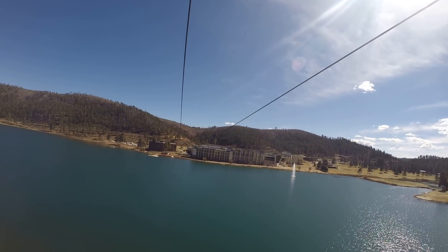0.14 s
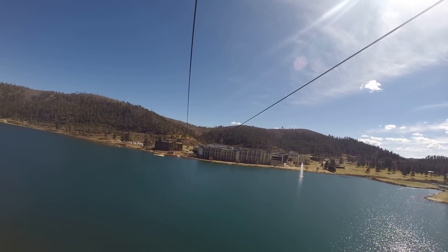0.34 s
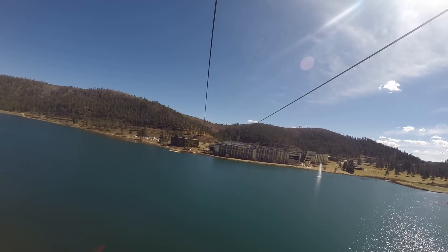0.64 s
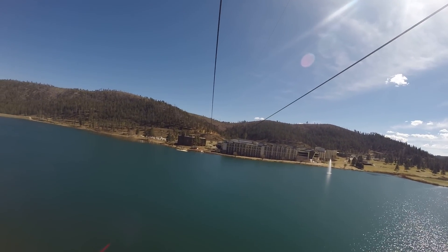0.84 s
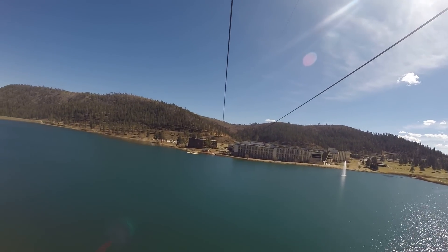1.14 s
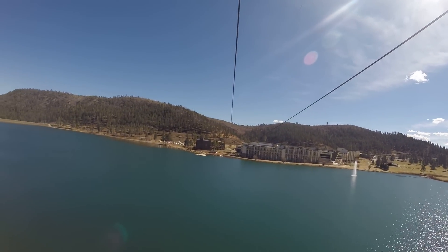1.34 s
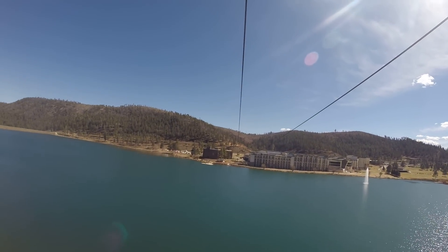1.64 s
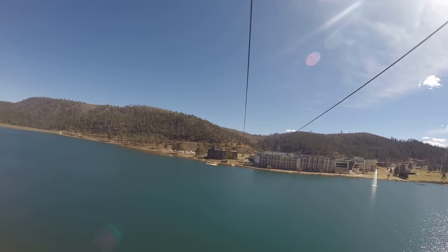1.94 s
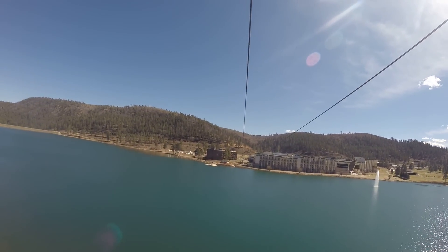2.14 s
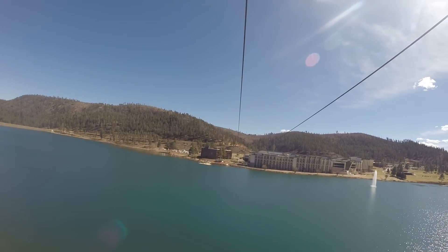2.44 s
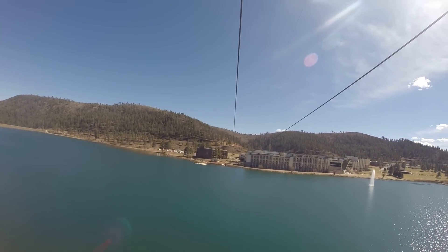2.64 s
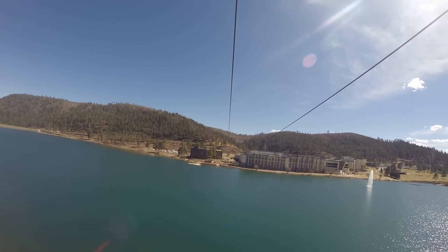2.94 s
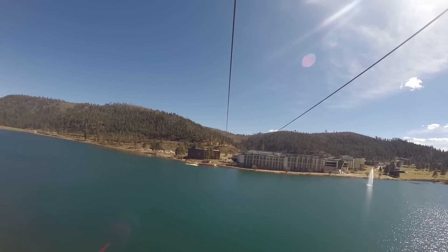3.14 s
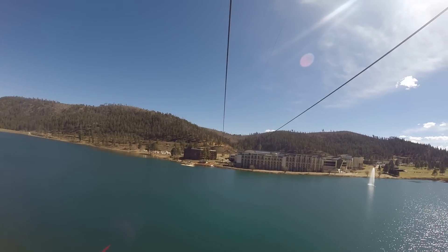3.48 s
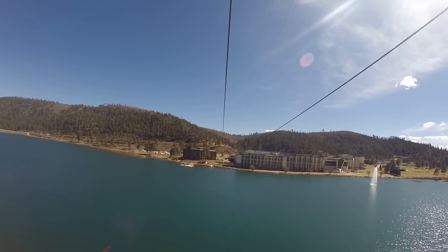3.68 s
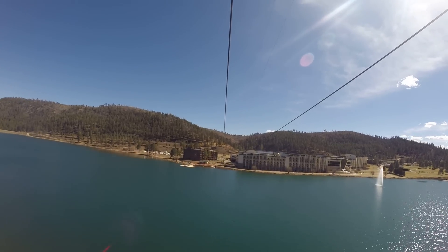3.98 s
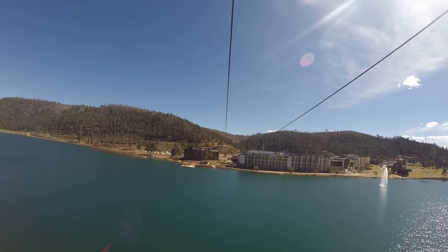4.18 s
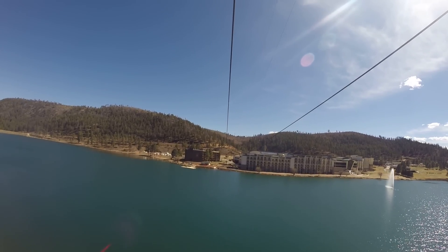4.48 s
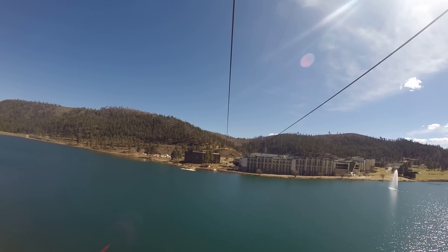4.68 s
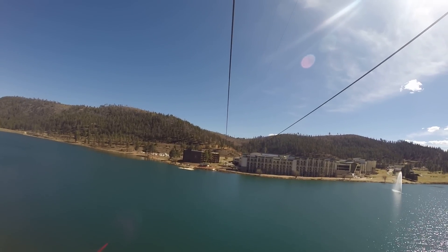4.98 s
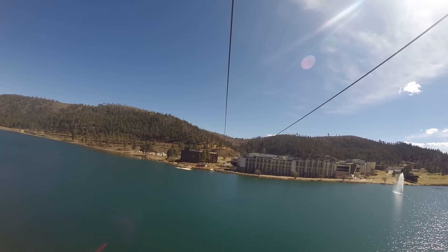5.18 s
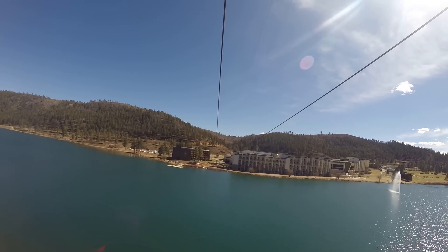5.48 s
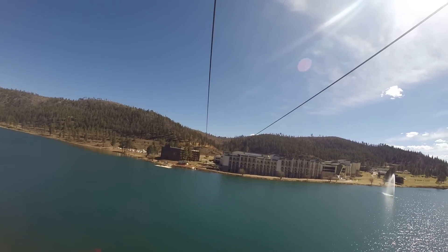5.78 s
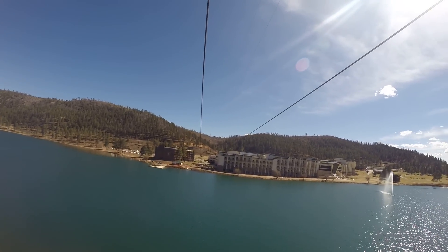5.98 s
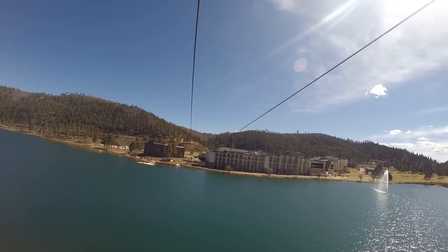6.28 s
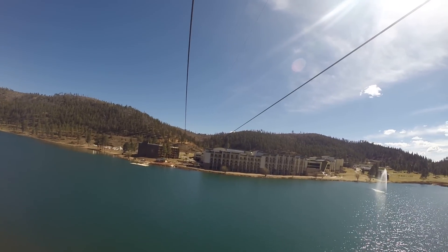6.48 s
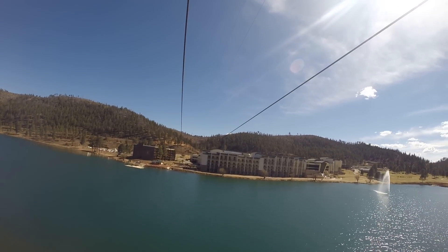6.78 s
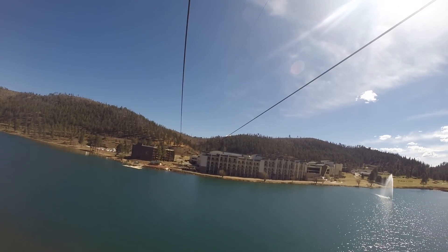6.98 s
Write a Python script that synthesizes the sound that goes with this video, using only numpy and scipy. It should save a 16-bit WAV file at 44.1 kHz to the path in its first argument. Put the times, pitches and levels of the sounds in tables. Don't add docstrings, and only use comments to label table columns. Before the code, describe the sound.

A pulley trolley rolls without pause down a steel cable above open water. Its wheel sings a dense, wavering, high metallic whine, joined by a second close tone from the cable strands. Sandy hiss shakes through the metal frame, with brief shudders and tiny skips. Wind buffets and roars at a microphone mounted right beside the trolley. The pitch slowly sinks as the ride eases, while the hiss grows rougher near the end.

```python
import sys
import numpy as np
from scipy import signal
from scipy.fft import rfft, irfft, next_fast_len
from scipy.io import wavfile
from scipy.ndimage import uniform_filter1d

SR = 44100
rng = np.random.default_rng(int(sys.argv[2]) if len(sys.argv) > 2 else 0)


def to_linear_factor(level_db):
    exponent = np.asarray(level_db, float) / 20
    return 10 ** exponent


def wav_record(signal):
    frames = np.transpose(np.atleast_2d(signal))
    bounded = np.clip(frames, -1, 1)
    quanta = np.round(bounded * 32767).astype(np.int16)
    wavfile.write(sys.argv[1], SR, quanta)


N = 313989
SIZE = next_fast_len(N, True)
HZ = np.fft.rfftfreq(SIZE, 1 / SR)
TIME = np.arange(N) / SR


def curves(table):
    s, *columns = np.transpose(table)
    return [np.interp(TIME, s, c) for c in columns]


def walk(rate):
    hold = int(SR / rate)
    steps = np.repeat(rng.standard_normal(N // 50), hold)[:N]
    smooth = uniform_filter1d(uniform_filter1d(steps, hold), hold)
    return 1.49 * smooth


def swell(s, width):
    return np.exp(-((TIME - s) / width) ** 2)


def from_mean(curve):
    return curve - curve.mean()


def lift(modes, hz):
    return sum(db / (1 + (2 * (hz - centre) / width) ** 2) for centre, width, db in modes)


def colour(points):
    hz, db = np.transpose(points)
    return np.interp(np.log(HZ + 1), np.log(hz), db)


def rush(colour_db, spans):
    spectrum = rfft(rng.standard_normal(SIZE)) * to_linear_factor(colour_db)
    third = np.log2(HZ + 1) * 3
    out = 0
    for lo, hi, level_db, flicker_db in spans:
        gust = walk(9)
        part = 0
        for centre in np.arange(np.ceil(3 * np.log2(lo)), 3 * np.log2(hi)):
            window = np.cos(np.pi / 2 * np.clip(third - centre, -1, 1)) ** 2
            band = irfft(spectrum * window, SIZE)[:N]
            part = part + band * to_linear_factor(flicker_db * (0.76 * walk(14) + 0.2 * gust))
        out = out + part / part.std() * to_linear_factor(level_db)
    return out


def tone(turns, db, waver_db):
    strength = np.sqrt(2) * to_linear_factor(db + waver_db * walk(4.03))
    drift_turns = .3 * walk(2)
    return strength * np.sin(2 * np.pi * (turns + rng.random() + drift_turns))


def controls():
    # time in seconds, load on the wheel as frame hiss in dB.
    load = [(0.0, -28), (0.48, -27), (0.5, -26), (0.85, -27), (0.97, -25.5), (1.07, -26.5), (1.76, -26),
            (1.78, -28.5), (3.01, -29.5), (3.09, -27), (3.79, -29.5), (3.98, -27.5), (5.61, -27.5),
            (5.83, -24.5), (6.66, -24), (7.12, -24)]
    # time in seconds, head wind as rush in dB, camera turned toward the side plate in dB.
    head_wind = [(0.0, -35, 3), (0.14, -32.5, 4), (0.3, -35, 4), (0.59, -34.5, 0), (0.63, -32.5, 2),
                 (0.75, -35.5, 0), (0.81, -30.5, 0.5), (2.32, -36, -3.5), (2.36, -34, -4), (2.6, -37.5, -2),
                 (4.0, -39, -1.5), (4.1, -36, -3), (4.64, -39, 0), (6.21, -32.5, 3), (6.31, -33.5, 1.5),
                 (7.12, -32, 4.5)]
    # time in seconds, width in seconds, frame rise in dB, top hiss rise in dB.
    jolts = [(.16, .05, 2.2, -1), (.79, .02, .8, 7), (.97, .05, 2.7, 0), (1.72, .05, 0.5, 2),
             (3.15, .04, 0.5, 0), (3.55, .04, -1.5, 0), (4.17, .05, 2.5, 1), (5.02, 0.027, 2, 1.2),
             (5.73, 0.011, -5, 2), (2.35, 0.028, 3.5, .6), (3.45, .08, -2, 0.3), (4.45, .1, -1, 0)]
    # time in seconds, width in seconds, buffeting rise in dB.
    puffs = [
        (.4, 0.25, -2),
        (2.7, 0.26, 2.5),
        (3.8, 0.49, 0.5),
        (5.1, .25, -1),
        (5.6, 0.13, 0.5),
        (6.8, 0.45, -0.5),
    ]
    (load_db,), (rush_db, turn_db) = curves(load), curves(head_wind)
    gust_db = from_mean(rush_db)

    body_db = load_db - .8 + sum(db * swell(s, w) for s, w, db, _ in jolts)
    upper_db = -42 + 0.46 * from_mean(body_db)
    top_db = -58.5 + .3 * gust_db + .3 * turn_db + 0.12 * from_mean(load_db)
    top_db = top_db + sum(db * swell(s, w) for s, w, _, db in jolts)
    low_db = -44 + 1.1 * gust_db
    plate_db = .7 * gust_db + turn_db

    buffet_db = -38 + 0.31 * gust_db + .7 * walk(3)
    buffet_db = buffet_db + sum(db * swell(s, w) for s, w, db in puffs)
    squall_db = 1.5 * swell(1.12, 0.54)
    roar_db = -43.5 + 0.84 * gust_db - .3 * turn_db + squall_db
    return (body_db, upper_db, top_db, low_db, plate_db), (buffet_db, roar_db, rush_db)


def wind(buffet_db, roar_db, rush_db):
    # frequency in Hz, noise level in dB per Hz.
    wind_colour = [(13, -43), (22, -7.5), (112, -2), (290, -6), (458, -14.5), (750, -15), (825, -13),
                   (924, -15.5), (1040, -12), (1430, -2), (1830, -7.5), (1940, -4), (2050, -9), (2660, -44),
                   (4510, -120)]
    port = [(25, 38, -12)]
    between_db = (1.385 * buffet_db + 0.63 * roar_db) / 2 - 7
    return rush(colour(wind_colour) + lift(port, HZ), [(15, 210, buffet_db - .3, .3),
                                                       (210, 300, between_db, 0.41),
                                                       (300, 900, roar_db + 1.0, 0.61),
                                                       (900, 1900, rush_db + 0.085, 1.0)])


def frame(body_db, upper_db, top_db, low_db, plate_db, wheel):
    # frequency in Hz, noise level in dB per Hz.
    frame_colour = [(1090, -32), (1850, -3.5), (1960, -8.5), (2140, -4), (2250, -5), (2430, -5.5),
                    (3250, -2.5), (3620, -5), (3950, -17), (5190, -15.5), (5750, -15.5), (6320, -21.5),
                    (6860, -19.5), (7930, -30.5), (8400, -37), (10900, -67), (18500, -120)]
    # centre in Hz, width in Hz, lift in dB.
    frame_modes = [(2640, 80, 2), (2910, 130, 2.5), (3060, 100, -1.5), (3270, 150, 2), (3420, 80, -2),
                   (3850, 100, -2), (4050, 200, 1.5), (4230, 50, 3), (4300, 50, -4), (4600, 120, 2),
                   (4740, 60, -4), (6480, 120, -2), (7500, 200, 2)]
    # frequency in Hz, noise level in dB per Hz.
    top_colour = [(4000, -30), (6800, -13), (7270, -5.5), (7970, -20), (8600, -14.5), (8950, -13.5),
                  (12600, -30.5), (14100, -28), (15000, -27.5)]
    # centre in Hz, width in Hz, lift in dB.
    case_modes = [(8300, 250, -2), (8750, 300, 2.5), (9250, 200, -2), (10200, 300, -2.5), (10700, 400, 2),
                  (12020, 250, 2.5), (12270, 120, -4), (13250, 450, -3), (13950, 250, -3), (15050, 250, -8)]
    pulse = np.cos(2 * np.pi * wheel)
    hiss = rush(colour(frame_colour) + lift(frame_modes, HZ),
                [(1800, 2300, low_db + 5.0, 0.67),
                 (2300, 3700, body_db - 0.95 + .1 * pulse, 1.4),
                 (3700, 7300, upper_db + 1.0 + 0.67 * pulse, 0.72)])

    plate = irfft(rfft(hiss, SIZE) * np.exp(-((HZ - 5220) / 270) ** 2), SIZE)[:N]
    plate_db = uniform_filter1d(plate_db, SR // 3)
    hiss = hiss + (to_linear_factor(0.67 * from_mean(plate_db)) - 1) * plate

    air_db = uniform_filter1d(top_db, SR // 4) - 12 + .3 * from_mean(body_db)
    top = rush(colour(top_colour) + lift(case_modes, HZ),
               [(7300, 11500, top_db + 1.5 + .5 * pulse, 1.2),
                (11500, 16500, air_db, 1.4)])
    return hiss + top


def whine(load_db):
    # time in seconds, wheel turns in Hz, strands passing in Hz.
    speed = [(0, 118.16, 2213), (.45, 117.74, 2215), (.95, 117.0, 2211), (1.5, 116.75, 2204),
             (1.75, 116.9, 2197), (2.25, 116.2, 2186), (2.5, 115.62, 2181), (3.45, 115.4, 2169),
             (3.6, 116.0, 2170), (4.2, 115.68, 2174), (5.0, 115.45, 2172), (5.55, 114.72, 2172),
             (5.85, 114.7, 2170), (6.15, 113.65, 2154), (6.4, 113.5, 2150), (6.85, 111.85, 2119),
             (7.12, 111.72, 2116)]
    # time in seconds, loudest wheel overtone in dB, strand tone in dB.
    contact = [(0, -42, -40), (.2, -42.5, -36), (.75, -36.5, -49), (1.0, -45, -38), (1.2, -33, -47),
               (1.4, -46, -35), (1.6, -37, -38), (1.8, -45, -37.5), (2.25, -44.5, -37.5), (3.3, -34, -46),
               (3.6, -36.5, -43), (4.2, -35.5, -39.5), (5.0, -36, -34), (5.6, -35, -42), (6.0, -35.5, -35),
               (6.15, -30, -50), (6.45, -30, -55), (6.7, -35, -50), (7.12, -33, -59)]
    # time in seconds, speed gain in percent, settling in seconds, contact loss in dB.
    skips = [
        (1.13, .5, .04, 0),
        (1.56, 1.3, .045, 0),
        (3.50, 1.8, .022, 8),
        (4.90, 2, .022, 3),
        (5.605, 1.8, .028, 1),
        (6.37, .8, .03, 0),
    ]
    # multiple of the wheel turn, level in dB.
    overtones = [(1, -46), (13, -54), (14, -54), (15, -57), (16, -55), (17, -56), (18, -46), (20, -42.5),
                 (21, -50), (22, -48), (24, -47), (25, -50), (26, -48), (30, -49), (31, -52), (32, -55),
                 (33, -59), (35, -64), (37, -66), (38, -65), (42, -67)]
    # centre in Hz, width in Hz, lift in dB.
    rings = [(2860, 40, 6), (4470, 110, 13)]
    singing_orders = (27, 28, 29, 39)
    resting_db = (-46, -49.5, -45.5, -71)
    # time in seconds, width in seconds, rise in dB.
    swells = [
        [(.5, .3, 6), (.95, .15, 10.5), (1.8, 0.26, -4), (4.5, 0.29, 4), (5.2, 0.091, 8), (6.1, .4, 9),
         (7.1, .4, -27)],
        [(.2, .2, 9), (.62, 0.17, 14.5), (1.2, .2, -9), (3.3, .3, 2), (4.4, 1, 11), (6.2, 0.84, 10.5),
         (7.1, 0.22, -1)],
        [(2.4, 0.46, 4), (3.2, 0.39, 3), (4.2, 1, 5), (6.0, .35, 11.4), (6.6, 0.15, 12.6), (7.1, 0.22, 6.9)],
        [(.6, 0.52, 16), (1.5, .3, 13), (2.4, 0.29, 16), (3.2, 0.48, 16), (4.4, 0.97, 17.5), (5.2, .2, -11),
         (5.95, .35, 10), (6.8, .2, -14)],
    ]
    # multiple of strand rate, wheel turns added, level in dB from the strand tone.
    strand_tones = [
        (1, 0, .2),
        (1, 1, -12),
        (1, -1, -15),
        (2, 0, -22),
        (2, -1, -21.5),
    ]
    (wheel_hz, strand_hz), (wheel_db, strand_db) = curves(speed), curves(contact)
    loss_db = 0
    for s, gain, settle, skip_db in skips:
        age = np.maximum(TIME - s, 0) / settle
        wheel_hz = wheel_hz * (1 + gain / 100 * np.e * age * np.exp(-age))
        loss_db = loss_db + skip_db * age * np.exp(1 - age / 2) / 2

    wheel = np.cumsum(wheel_hz * (1 + .0006 * walk(25))) / SR
    strand = np.cumsum(strand_hz * (1 + .0006 * walk(25))) / SR

    out = tone(19 * wheel, wheel_db + .4 - loss_db, waver_db=.9)
    for k, db in overtones:
        level_db = db + load_db * min(k / 30, 1) ** 3 - loss_db + lift(rings, k * wheel_hz)
        out = out + tone(k * wheel, level_db, waver_db=1.9)
    for k, db, rows in zip(singing_orders, resting_db, swells):
        singing_db = db + sum(up * swell(s, w) for s, w, up in rows)
        out = out + tone(k * wheel, singing_db + 1 - loss_db, waver_db=1.1)
    for m, k, db in strand_tones:
        out = out + tone(m * strand + k * wheel, strand_db + db, waver_db=.9)
    return out, wheel


def scene():
    hiss_db, wind_db = controls()
    tones, wheel = whine(0.75 * from_mean(hiss_db[0]))
    return (tones + frame(*hiss_db, wheel) + wind(*wind_db))[None]


def low_pass(x):
    return signal.sosfilt(signal.butter(12, 15170, fs=SR, output="sos"), x)


def record(dry):
    return low_pass(dry)


dry = scene()
out = record(dry)
wav_record(out)
```